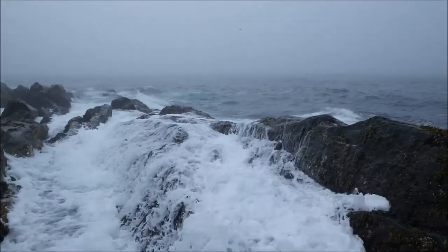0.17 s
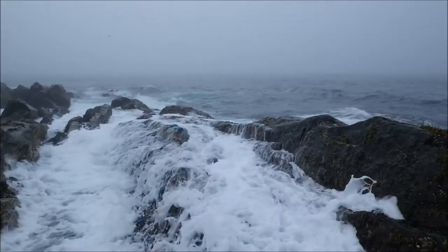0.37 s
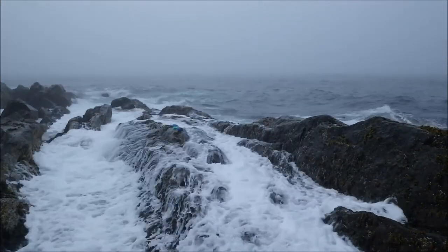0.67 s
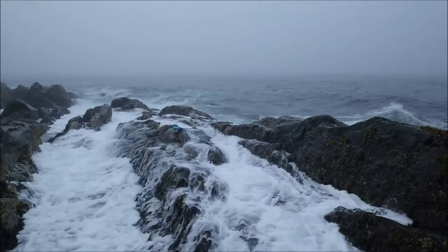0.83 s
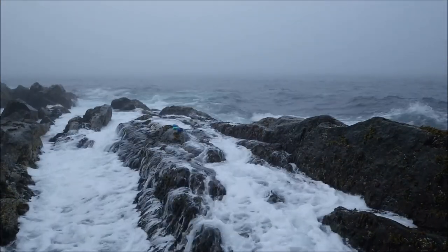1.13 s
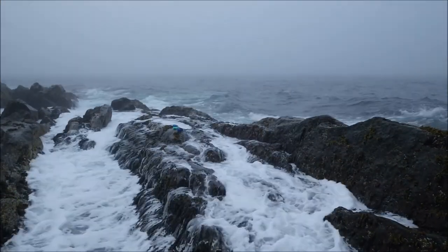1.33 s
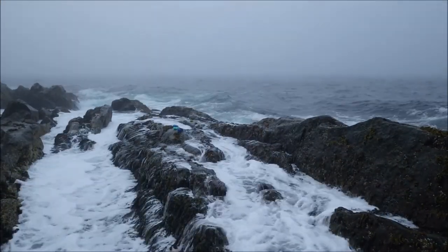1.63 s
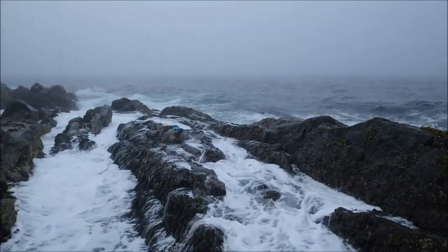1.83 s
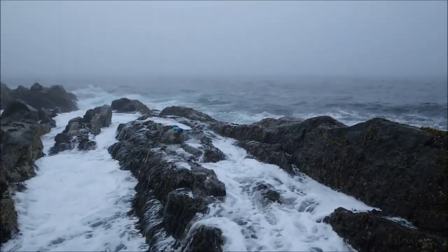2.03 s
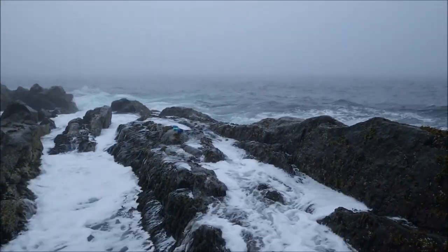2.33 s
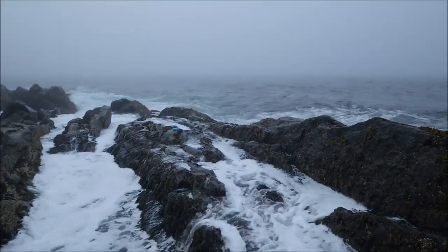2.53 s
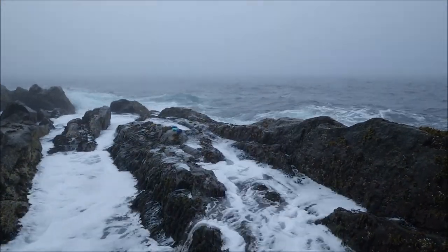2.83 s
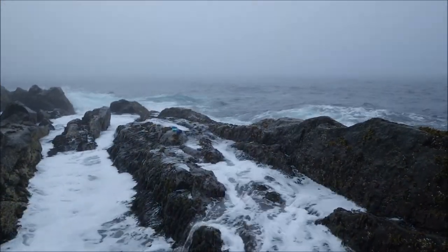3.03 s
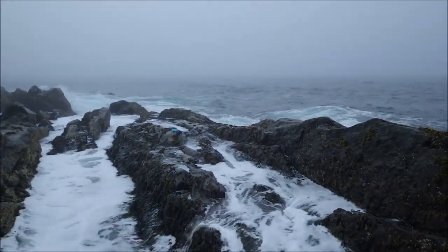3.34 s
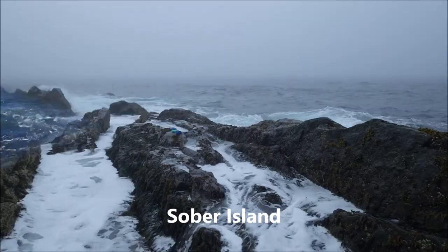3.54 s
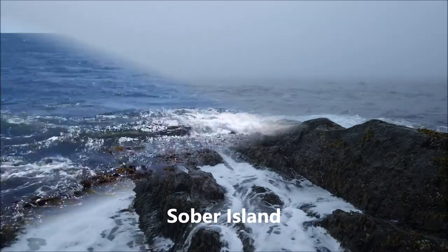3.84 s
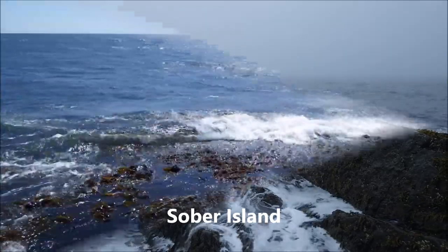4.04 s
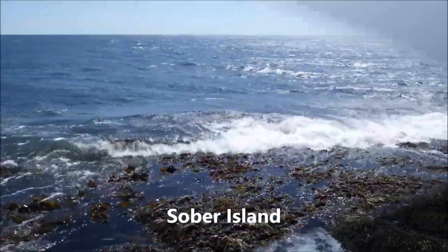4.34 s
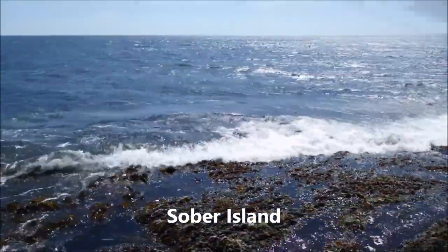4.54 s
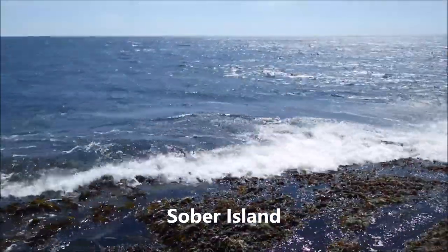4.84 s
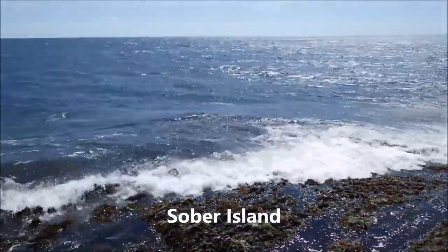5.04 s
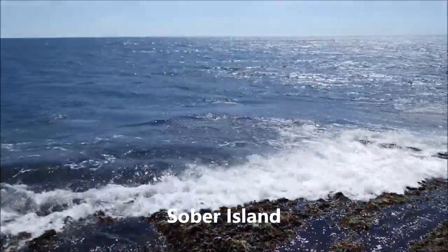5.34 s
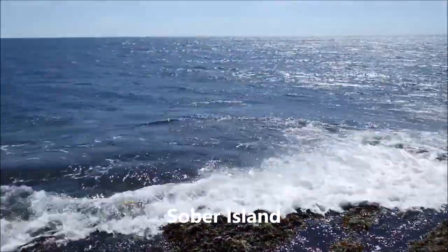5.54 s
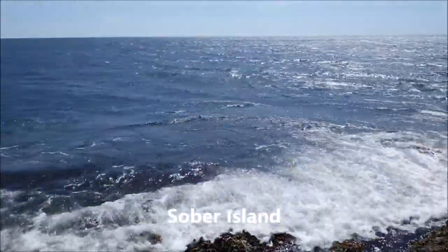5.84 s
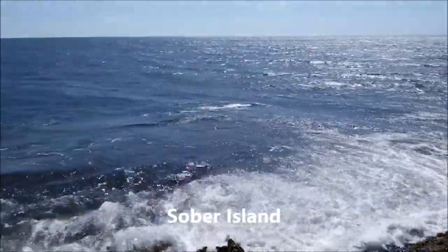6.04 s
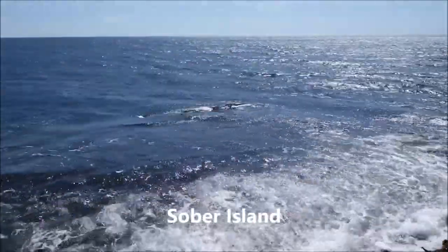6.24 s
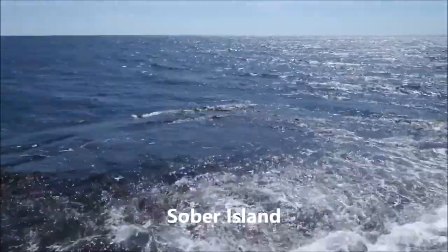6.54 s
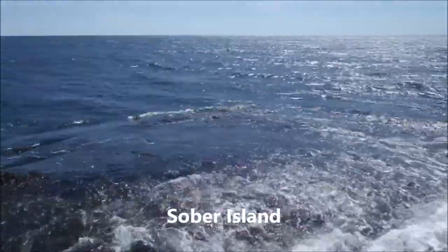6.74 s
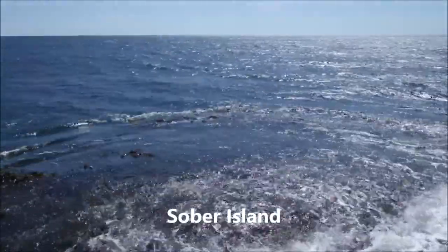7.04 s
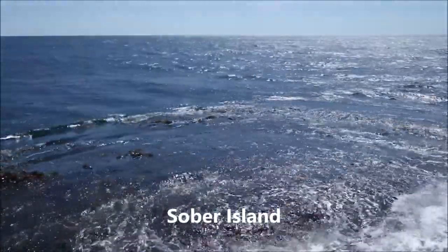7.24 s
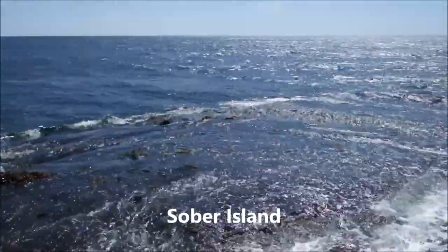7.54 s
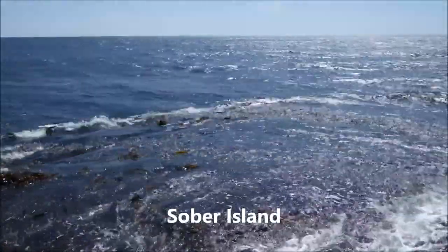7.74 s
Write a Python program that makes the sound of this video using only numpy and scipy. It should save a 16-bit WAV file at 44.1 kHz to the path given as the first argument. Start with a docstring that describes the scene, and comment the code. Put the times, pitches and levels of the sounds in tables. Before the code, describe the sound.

A wave drains over rocks with dense hiss and low boom, then a windy shore cuts in, rumbling and popping over faint wash.

```python
"""Surf on rocks, then a windy shore

Two shores, one after the other, at a small camera with a left and a right microphone port. Close by, surf pours
over rocks: fizzing foam, roar and boom, all shaped noise. A windy shore with distant surf cuts in at 3.4 s, and
the near surf stops at 4.9 s. Wind is low noise in gusts, with pops made of decaying noise and a low push.
Surf and wind drop suddenly in level at set moments and creep back; port cavities and notches colour most layers.
"""
import sys
import numpy as np
from scipy import signal
from scipy.fft import rfft, irfft, next_fast_len
from scipy.io import wavfile
from scipy.ndimage import uniform_filter1d, map_coordinates

SR = 44100
rng = np.random.default_rng(int(sys.argv[2]) if len(sys.argv) > 2 else 0)


def bounce(signal):
    """Save signal as a 16-bit WAV file at the path given by the first command-line argument."""
    frames = np.transpose(np.atleast_2d(signal))
    limited = np.clip(frames, -1, 1)
    pcm = np.round(limited * 32767).astype(np.int16)
    wavfile.write(sys.argv[1], SR, pcm)


N = 347949

# Near surf, foam as a wave slaps down and drains, before the level drops [t/s, level/dB]
FIZZ = [(0, -20.5), (.2, -20.5), (.267, -15.5), (.45, -17.5), (.62, -18), (.66, -16.5), (.84, -20.5),
        (.88, -17.5), (.95, -20.5), (1.9, -20.5), (2.4, -21), (3.2, -23), (3.45, -24.5), (3.75, -22.5),
        (4.2, -25), (4.45, -23.5), (4.62, -24.5), (4.89, -25)]
# Near surf, falling water, relative to the fizz [t/s, roar level/dB, boom level/dB]
ROAR_AND_BOOM = [(0, -1, -5.5), (.35, -3, -12.5), (.65, -1.5, -8), (1.15, -3, -9), (1.25, 0.3, -4),
                 (1.5, -2, -6.5), (2.1, -.4, -2), (2.45, -1.5, -6.5), (2.7, -0.5, -1.5), (3, -.6, -8),
                 (3.4, -2.5, -4)]
# Distant surf of the windy shore, before the level drops [t/s, level/dB]
FAR_SURF = [(3.41, -31), (4.9, -39), (5.15, -40), (5.35, -36), (5.65, -38.5), (5.95, -37.5), (6.53, -36),
            (7.45, -34.5), (7.64, -37), (7.89, -40.5)]
# Steady stream of wind over the ports, before gusts and level drops [t/s, buffet level/dB]
WIND_STREAM = [(3.41, -18.5), (3.52, -12), (3.8, -15), (4, -13.5), (4.1, -18), (4.37, -22), (4.55, -16.5),
               (4.73, -27), (4.91, -24), (5.2, -18.5), (5.47, -15.5), (5.68, -16.5), (5.95, -14),
               (6.3, -15), (6.47, -18), (6.6, -14), (7, -13.5), (7.4, -13.5), (7.6, -13), (7.79, -17.5),
               (7.89, -12)]
# Gusts and lulls on that stream [t/s, level above it/dB, rise and equal fall/s]
GUSTS = [(3.427, 12, 0.042), (3.85, 5, 0.084), (4.041, -4, 0.027), (4.077, 6, .03), (4.393, 5, .08),
         (4.631, 9.5, 0.029), (4.707, 6, 0.028), (4.757, 15, .04), (4.885, 8.5, 0.024), (5.0, 6, 0.047),
         (5.08, 9.5, 0.04), (5.142, 8, 0.032), (5.54, 4.5, 0.037), (5.634, 2.5, 0.035), (5.708, 9.5, 0.032),
         (5.729, -5, 0.016), (6.117, 3.5, .05), (6.247, 5, .035), (6.345, 4, 0.044), (6.421, 5.5, .04),
         (6.512, 10, .05), (6.565, -4, .035), (6.723, 8, 0.091), (6.859, 4.5, 0.035), (6.969, 7, 0.028),
         (7.025, 4.5, 0.027), (7.197, 6.5, 0.15), (7.5, 10.5, 0.051), (7.643, 5, .06), (7.674, -5, 0.022),
         (7.712, 10.5, .03), (7.872, 8.5, 0.039)]
# The loudest wind pops, ahead of the port colouring [t/s, level/dB, left minus right/dB]
POPS = [(3.53, -11, -2.5), (3.567, -10, 5), (3.621, -13, 4), (3.639, -12, 0), (3.687, -13, -9),
        (3.818, -14, -1), (3.84, -11.5, -9), (3.871, -1.5, 6), (3.969, -14, 12), (4.267, -9, -2),
        (4.402, -13, 2), (4.625, -7.5, 3), (4.671, -12, -.5), (4.699, -14, -1), (4.754, -8, -4),
        (5.144, -17, 14), (5.352, -16, 5), (5.381, -5.5, -2.5), (5.411, -11.5, 5), (5.503, -11.5, -7),
        (5.539, -13, -6), (5.657, -17, -3.5), (5.77, -13.5, -2), (5.807, -14.5, -1.5), (6.077, -17.5, 4),
        (6.214, -23, .5), (6.307, -15, 3), (6.337, -19, 7), (6.473, -19, .5), (6.517, -10, 4),
        (6.664, -24, 0), (6.696, -23, 3.5), (6.732, -18, 0), (6.932, -16, 4), (6.986, -24, 2),
        (7.086, -14.5, 7), (7.192, -14, -1.5), (7.225, -14, 0), (7.295, -5, 3.5), (7.408, -8, 4),
        (7.492, -6.5, 1.5), (7.581, -12, 7), (7.639, -11.5, -1.5), (7.862, -20, 1.5)]
# Short treble ticks, ahead of their low cut [t/s, level/dB]
TICKS = [(0.2628, -31), (3.1931, -34), (3.4111, -29.5), (4.7855, -33), (4.8853, -39), (5.5383, -40),
         (5.7029, -47), (6.5191, -34), (6.5254, -39), (7.4101, -46), (7.6261, -38), (7.6385, -37)]
# A drop of spray on the left port, ahead of its filters [t/s, starting level/dB]
SPRAY_DROP = (4.785, -4)
# Sudden drops in level [t/s, depth/dB]
LEVEL_DROPS = [(.268, 6.5), (3.197, 3.5), (4.787, 2.5), (5.71, 8), (6.529, 12), (7.646, 9)]

# Spectra ahead of the ports, shape only: near foam, distant surf, fine spray, roar, boom,
# large wind eddies, small wind eddies [f/Hz, level/dB per Hz]
FIZZ_SPECTRUM = [(700, -12), (1500, -0.5), (2300, -0.5), (3300, -2.5), (4500, -6.5), (6000, -11),
                 (7500, -17.5), (9000, -23), (12000, -28.5), (15500, -34)]
FAR_SPECTRUM = [(700, -0.5), (1500, 0), (2100, 1.5), (2500, -4), (3050, -2), (3700, -6), (4500, -5),
                (6000, -11), (7500, -18.5), (9000, -25), (12000, -31), (15500, -41)]
MIST_SPECTRUM = [(6000, -20), (9000, -5), (12000, -1), (15500, -3)]
ROAR_SPECTRUM = [(60, -27), (130, 0), (200, 0), (400, -6.5), (800, -8.5), (1400, -14.5), (2500, -30)]
BOOM_SPECTRUM = [(20, -31), (40, -8), (80, -3), (150, -6), (300, -20.5)]
BUFFET_SPECTRUM = [(8.8, -37), (15, -10.5), (43, -2), (81, -0.5), (101, -3), (231, -14), (276, -17),
                   (400, -22), (520, -32.5), (880, -120)]
FLUTTER_SPECTRUM = [(60, -20), (150, -1), (300, -2.5), (600, -5.5), (1000, -14.5), (1600, -21), (2500, -36),
                    (5000, -68)]

# Left-right likeness ahead of the ports, for surf and for wind [f/Hz, likeness 0 to 1]
ALIKE_SURF = [(100, .998), (500, .9995), (900, .99998), (1900, .99998), (2200, .99), (2800, .97),
              (3800, .94), (5000, .88), (7200, .9), (8000, .5), (11000, .42), (14000, .15)]
ALIKE_WIND = [(30, 1), (80, 0.95), (200, 0.77), (1200, 0.78)]
# Cavities behind the two ports, then the camera's notch filters [f/Hz, width/Hz, gain/dB]
LEFT_PORT = [(2687, 410, 21), (3118, 2300, -22.5), (3684, 310, 8), (5609, 3600, -11.5), (6133, 570, 18),
             (8600, 1800, 2.5)]
RIGHT_PORT = [(2565, 230, 24), (2867, 1460, -19), (4357, 1500, -14), (4945, 400, 9), (5979, 1600, 6),
              (11300, 2000, 4)]
NOTCHES = [(1599, 590, -29), (2073, 450, -26), (3184, 290, -22), (4164, 510, -31), (7866, 160, -13)]

WINDY_FROM_S, NEAR_UNTIL_S = 3.412, 4.887
FALL_S, RECOVERY_DB_PER_S = .008, 10  # the level drops
FLUTTER_DB = -10.5  # small eddies, relative to the buffet in the plain stream
FLUTTER_FOLLOWS = 0.68  # share of each gust or lull, in dB, that the small eddies follow
PUSH_DB = -4  # starting peak of the low push, relative to its pop's level
FAINT_POPS, FAINT_DB, FAINT_SPREAD_DB = 24, -6.5, 3  # count; mean and spread relative to the wind's level
TOP_HZ = 15700  # band limit


def amp(db):
    """Gain as an amplitude ratio from dB."""
    return 10 ** (np.asarray(db) / 20)


def unit(x):
    """x scaled to rms 1."""
    return x / np.sqrt(np.mean(x ** 2) + 1e-20)


def along(points, hz):
    """Read (f/Hz, value) points on a log frequency axis."""
    f, value = np.transpose(points)
    return np.interp(np.log(hz + 1), np.log(f + 1), value)


def curves(rows):
    """One value per sample for each column after the time."""
    s, *columns = np.transpose(rows)
    return [np.interp(np.arange(N) / SR, s, column) for column in columns]


def wobble(rate):
    """A smooth random curve through rate knots a second."""
    knots = rng.standard_normal(int(N * rate / SR) + 4)
    return map_coordinates(knots, [np.arange(N) * rate / SR])


def filtered(x, response):
    """x through a complex response given as a function of f/Hz."""
    m = next_fast_len(N + 8192, real=True)
    spectrum = rfft(x, m) * response(np.fft.rfftfreq(m, 1 / SR))
    return irfft(spectrum, m)[..., :N]


def bells(modes, f):
    """A causal chain of resonant peaks and dips."""
    chain = 1
    for centre, width, db in modes:
        band = 1j * f * width / (centre ** 2 - f ** 2 + 1j * f * width)
        chain = chain * (1 + (amp(db) - 1) * band)
    return chain


def camera(f):
    """Port cavities and shared notches; the right port is more sensitive and, high up, ahead in phase."""
    skew = amp(-.3) * np.exp(-1j * np.clip((f - 7800) / 3400, 0, 1.5))
    left = skew * bells(LEFT_PORT, f)
    right = bells(RIGHT_PORT, f) / skew
    return bells(NOTCHES, f) * np.array([left, right])


def rush(spectrum, alike, patchy_db, lumps=1):
    """Stereo noise in lumps, with random patches of gain in time and pitch, through the ports, rms 1."""
    noise = signal.stft(lumps * rng.standard_normal((2, N)), nperseg=512)[2]
    field = rng.standard_normal(noise.shape[1:])
    field = uniform_filter1d(uniform_filter1d(field, 8, 0), 8, 1)
    pair = signal.istft(noise * amp(patchy_db * unit(field)), nperseg=512)[1][:, :N]

    def mid_side_response(hz):
        # the angle sets the share of side signal that gives the wanted left-right likeness
        turn = np.arccos(np.clip(along(alike, hz), -1, 1)) / 2
        shape = amp(along([(1, -120), *spectrum, (SR / 2, -120)], hz))
        return shape * np.array([np.cos(turn), np.sin(turn)])

    mid, side = filtered(pair, mid_side_response)
    return unit(filtered(np.array([mid + side, mid - side]), camera))


def level_db():
    """Each level drop comes within a few milliseconds and is won back at a steady rate in dB."""
    t = np.arange(N) / SR
    total = np.zeros(N)
    for s, depth_db in LEVEL_DROPS:
        fall = np.clip((t - s) / FALL_S + .5, 0, 1)
        total -= fall * np.maximum(depth_db - RECOVERY_DB_PER_S * (t - s), 0)
    return total


def wind_db(follows=1):
    """The stream with a share of its gusts and lulls, under the level drops."""
    t = np.arange(N) / SR
    gusts = sum(db * np.maximum(1 - np.abs(t - s) / span, 0) for s, db, span in GUSTS)
    return curves(WIND_STREAM)[0] + follows * gusts + level_db()


def ticks():
    """Faint treble ticks: very short noise bursts, partly shared by left and right."""
    out, shape = np.zeros((2, N + SR)), np.hanning(SR // 400)
    for s, db in TICKS:
        shared = rng.standard_normal(len(shape))
        own = rng.standard_normal((2, len(shape)))
        out[:, round(s * SR):][:, :len(shape)] += amp(db) * shape * (shared + .6 * own)
    return filtered(out[:, :N], lambda hz: 1 / (1 + (7000 / (hz + 1)) ** 3))


def far_surf():
    """Many distant breakers blend into a smooth wash of noise."""
    wash_db, = curves(FAR_SURF)
    wash = rush(FAR_SPECTRUM, ALIKE_SURF, patchy_db=0.6, lumps=amp(0.47 * wobble(14)))
    return amp(wash_db + level_db()) * wash


def fine_spray():
    """Fine spray close by hisses faintly at a steady level, high in the treble."""
    return amp(-58) * rush(MIST_SPECTRUM, ALIKE_SURF, patchy_db=0.0)


def spray_drop():
    """A drop strikes the left port alone: one short splat of decaying noise, softened in the treble."""
    out, t = np.zeros((2, N)), np.arange(SR // 100) / SR
    s, db = SPRAY_DROP
    out[0, round(s * SR):][:len(t)] = amp(db - 60 * t / .016) * rng.standard_normal(len(t))
    return filtered(out, lambda hz: camera(hz) / (1 + 1j * hz / 3000) ** 2)


def near_surf():
    """Foam fizzes in bunches of bursting bubbles over the roar of falling water and a low boom."""
    fizz_db, = curves(FIZZ)
    roar_db, boom_db = curves(ROAR_AND_BOOM)
    surge = wobble(14)  # water slaps down in lumps that move fizz and roar together
    bubbles = amp(0.52 * surge + 0.26 * wobble(90) + 1.2 * wobble(600))
    falls = amp(0.46 * surge + 0.95 * wobble(40))
    fizz = rush(FIZZ_SPECTRUM, ALIKE_SURF, patchy_db=0.72, lumps=bubbles)
    roar = amp(roar_db) * rush(ROAR_SPECTRUM, ALIKE_SURF, patchy_db=0.56, lumps=falls)
    thuds = amp(1.25 * wobble(12))
    boom = amp(boom_db) * rush(BOOM_SPECTRUM, [(50, 1.0)], patchy_db=0.4, lumps=thuds)
    return amp(fizz_db + level_db()) * (fizz + roar + boom)


def wind():
    """Eddies push the membranes; the small ones come in sharp clumps riding on the large ones."""
    eddies = wobble(35)
    buffet = rush(BUFFET_SPECTRUM, ALIKE_WIND, patchy_db=0.14, lumps=amp(2.1 * eddies))
    # the stream keeps the large eddies coming evenly
    swing = uniform_filter1d(np.mean(buffet ** 2, 0), SR // 30)
    buffet = unit(buffet / (np.abs(swing) + 0.16) ** 0.18)
    each_port = np.array([wobble(80), wobble(80)])
    clumps = amp(3 * eddies + 3 * each_port + 3 * wobble(220))
    flutter = amp(FLUTTER_DB) * rush(FLUTTER_SPECTRUM, ALIKE_WIND, patchy_db=-0.1, lumps=clumps)
    return amp(wind_db()) * buffet + amp(wind_db(FLUTTER_FOLLOWS)) * flutter


def pops():
    """A small eddy collapses at a port: a brief ragged flap, soft in the treble, over one low push."""
    out, t = np.zeros((2, N + SR)), np.arange(SR // 20) / SR
    # fainter pops at random moments of the windy shore
    chance = rng.standard_normal((FAINT_POPS, 2))
    when = rng.uniform(WINDY_FROM_S, (N - 1) / SR, FAINT_POPS)
    faint_db = wind_db()[(when * SR).astype(int)] + FAINT_DB + FAINT_SPREAD_DB * chance[:, 0]
    faint = np.c_[when, faint_db, 2.5 * chance[:, 1]]
    for s, db, pan_db in [*POPS, *faint]:
        envelope = (1 - np.exp(-t / 0.0013)) * amp(-60 * t / 0.038)
        flap = unit(rng.standard_normal(len(t)) * envelope)
        hz = 110 * amp(rng.normal(0, 2.6))  # pitch scatters about 110 Hz
        push = rng.choice([-1, 1]) * amp(PUSH_DB - 60 * t / 0.057) * np.sin(2 * np.pi * hz * t)
        gains = amp(db + np.array([[pan_db / 2], [-pan_db / 2]]))
        out[:, round(s * SR):][:, :len(t)] += gains * (flap + push)
    return filtered(out[:, :N], lambda hz: camera(hz) / (1 + 1j * hz / 1150) ** 4)


def scene():
    """The windy shore enters within 1.5 ms; the near shore stops abruptly later."""
    t = np.arange(N) / SR
    near = (near_surf() + fine_spray()) * (np.arange(N) < NEAR_UNTIL_S * SR)
    entry = np.clip((t - WINDY_FROM_S) / .0015, 0, 1)
    windy = entry * (far_surf() + wind())
    return near + windy + pops() + ticks() + spray_drop()


def record(dry):
    """Peaks round off near full scale; the top fades from 15 kHz to the band limit."""
    rounded = dry / (1 + np.abs(dry / .97) ** 8) ** (1 / 8)
    return filtered(rounded, lambda hz: (hz < TOP_HZ) * amp(-.025 * np.maximum(hz - 15000, 0)))


dry = scene()
out = record(dry)
bounce(out)
```